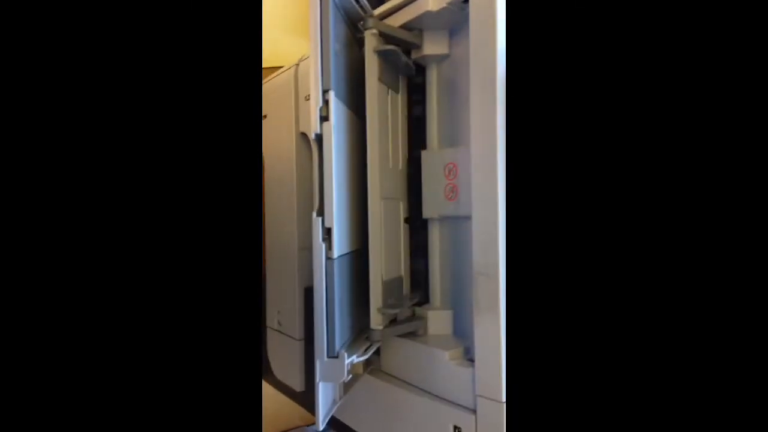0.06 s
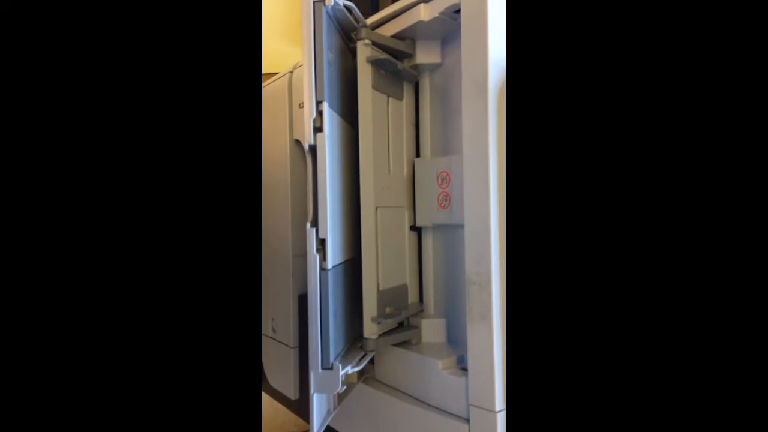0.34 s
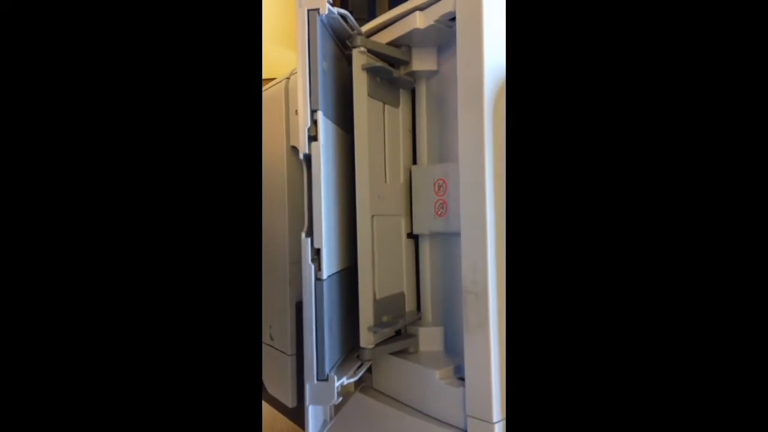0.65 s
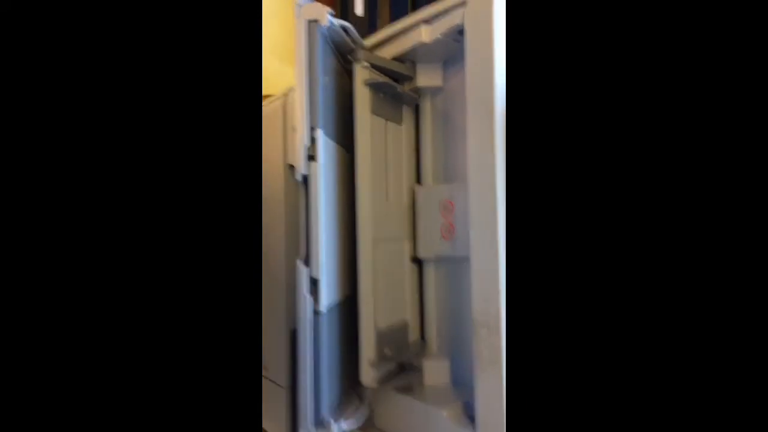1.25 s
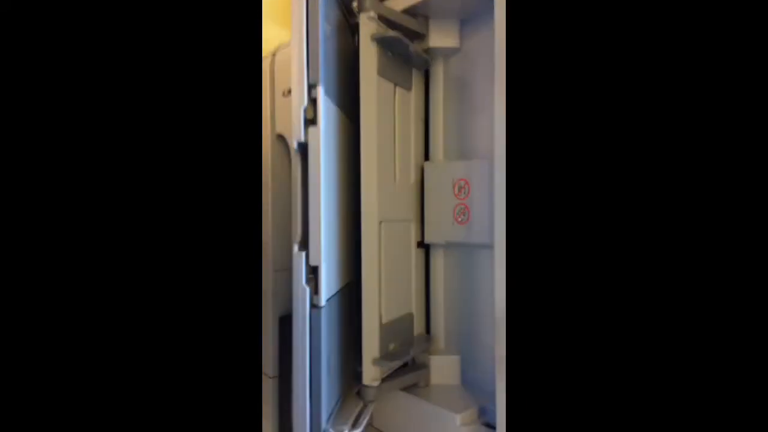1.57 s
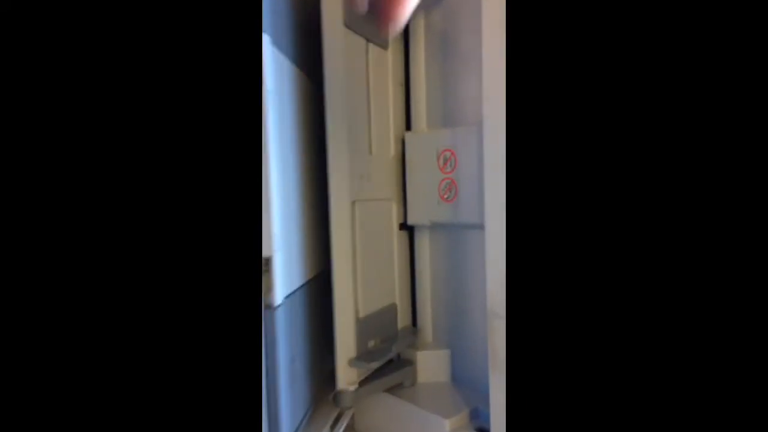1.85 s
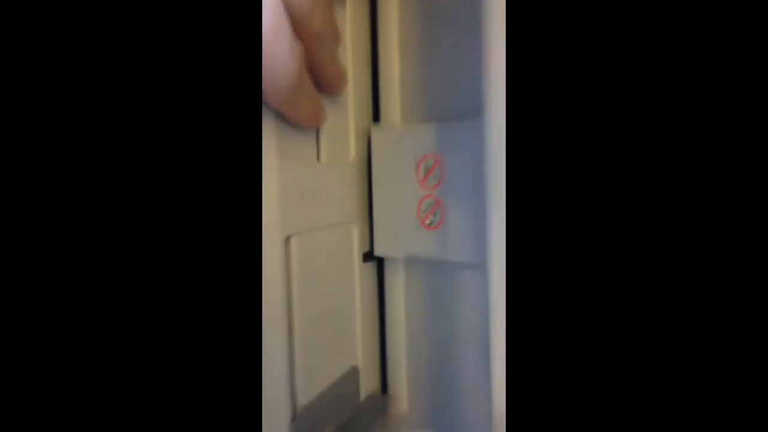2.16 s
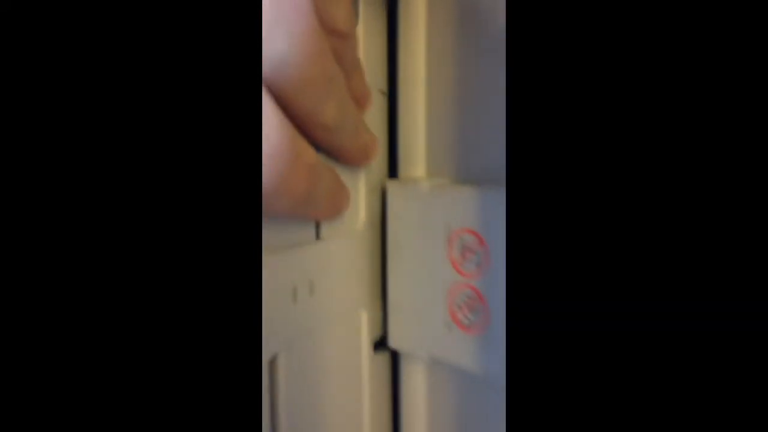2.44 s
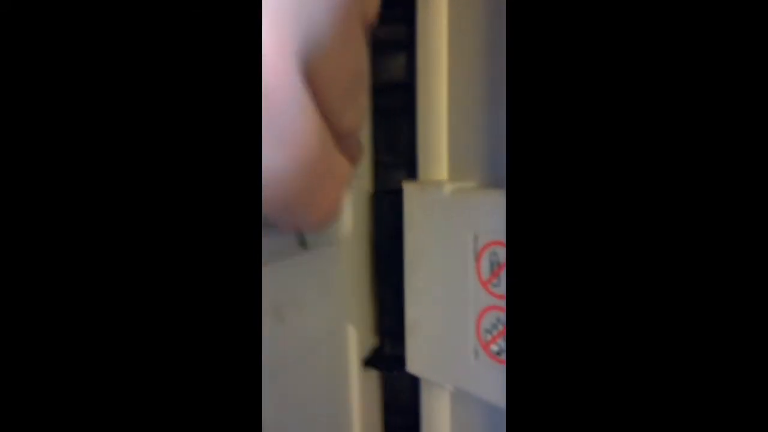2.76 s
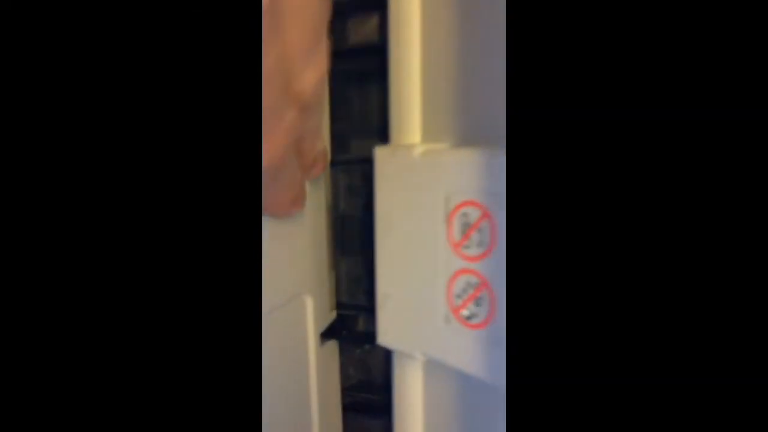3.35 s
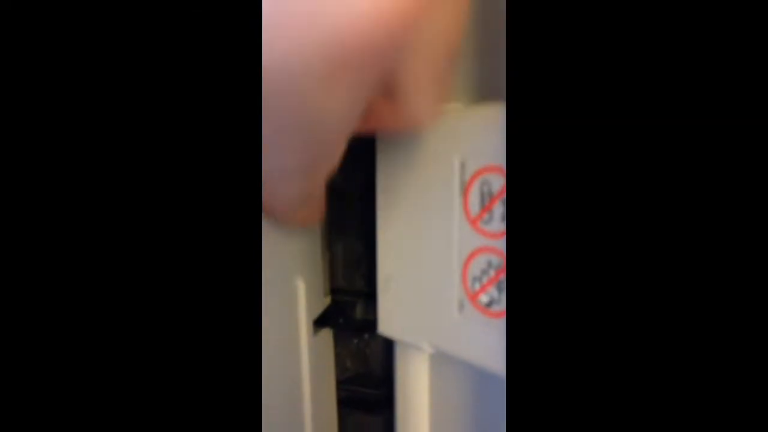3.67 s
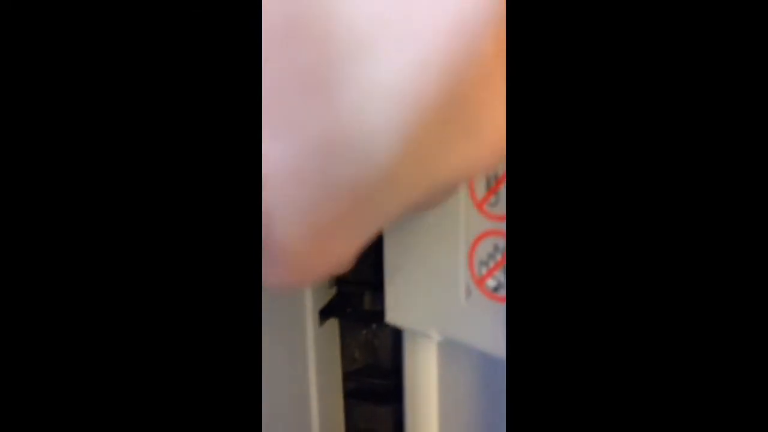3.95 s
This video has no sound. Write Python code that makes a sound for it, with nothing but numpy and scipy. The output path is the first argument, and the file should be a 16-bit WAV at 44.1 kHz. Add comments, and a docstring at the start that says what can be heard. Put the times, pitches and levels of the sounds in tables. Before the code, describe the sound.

Plastic printer tray flaps twice over a whirring motor, followed by handling knocks and clicks.

```python
"""A small room, close to a printer with its side door open. The motor twice drops the plastic paper tray
with a clack and lifts it with a clatter, and the panels ring. A rubber roller squeaks once; the motor
stops and its gears coast. Over the idling fan a hand takes hold of the tray, presses it down, and knocks
and rubs on the plastic. Knocks make the tray ring and the door thump; a spring rings as the tray unlatches."""
import sys
import numpy as np
from scipy import signal
from scipy.fft import rfft, irfft
from scipy.io import wavfile
from scipy.ndimage import uniform_filter1d

SR = 44100
rng = np.random.default_rng(int(sys.argv[2]) if len(sys.argv) > 2 else 0)


def pcm_store(signal):
    """Save signal as 16-bit PCM."""
    levels = np.round(np.clip(np.atleast_2d(signal), -1, 1) * 32767)
    wavfile.write(sys.argv[1], SR, levels.astype(np.int16).T)


N = 176400
T = np.arange(N) / SR
HIT_T = T[:16384]  # time in seconds within one hit

# How long the room echoes. Each row: pitch in Hz, fade time (t60, the time to drop 60 dB) in seconds.
ROOM_T60 = [(120, 0.517), (500, 0.31), (2000, 0.3), (6000, 0.31), (14000, .2)]
# The echo's colour, meaning how strong its lows and highs are. Each row: pitch in Hz, level in dB.
ROOM_COLOUR = [(100, -6), (500, 14), (2000, -0.5), (6000, -0.5), (14000, -5.5)]
# The fan's rush of air. Each row: pitch in Hz, level in dB.
FAN_COLOUR = [(20, -31.5), (55, -6), (90, -22.5), (135, -4), (230, -14), (320, -10.5), (420, -16),
              (660, -14), (1100, -18.5), (2000, -22), (3300, -27.5), (6700, -31), (10000, -32),
              (14700, -32.5), (16000, -48)]
# The fan's hum. Each row: pitch in Hz, level in dB.
FAN_TONES = [(177.6, -63.5), (665, -72.5), (1065, -76.5)]
# The motor's hum. Each row: pitch in Hz, level in dB, fade time after the stop in seconds.
MOTOR_TONES = [(84, -50.5, 0.4), (128.6, -45.5, 0.44), (170, -34.5, 0.078), (246, -57, .2),
               (342.5, -46, 0.12), (426, -54, .2), (510, -56, 0.43)]
# The hum swells with the motor's load. Each row: time in seconds, change of level in dB.
MOTOR_LOAD = [(0, -3.5), (.21, -2.5), (.33, 0.5), (.44, -2), (.54, -2), (.63, 0.5), (.77, -2)]
# The whirr of the gears. Each row: pitch in Hz, level in dB.
GEAR_COLOUR = [(24, -37), (40, -12), (118, -6.5), (180, -13.5), (226, -15), (283, -10.5), (600, -19.5),
               (1210, -13.5), (1340, -12.5), (2000, -8), (2320, -18), (5050, -27.5), (7540, -39.5),
               (14100, -47.5), (16000, -73.5)]
# The frame's modes (its own notes). Each row: pitch in Hz, level in dB, fade time in seconds.
FRAME_MODES = [(994, -52, 1.1), (1714, -62.5, 3.6), (1850, -63.5, 0.9), (2210, -58.5, 1.5)]
# The tones in the squeak. Each row: multiple of the lowest pitch, level in dB.
SQUEAK_TONES = [(1, -23.5), (2, -37), (3, -28), (5, -50)]
# Finger strokes. Each row: start in seconds, length in seconds, level in dB,
# tilt in dB per octave (higher is brighter), level of the plastic's singing in dB.
RUBS = [(2.05, 0.24, -65, 2, -10), (2.243, 0.38, -61, 2, -9), (2.525, 0.11, -58.5, 3.5, -7),
        (2.644, 0.11, -50.5, 2, -1), (2.751, 0.18, -51.5, 2, -5), (2.88, 0.18, -56, -0.5, -8),
        (3.024, 0.066, -53, 2.1, -4), (3.074, 0.18, -57.5, 2.5, -10), (3.234, 0.077, -56, 1.5, -7),
        (3.29, 0.36, -57.5, 0.5, -20), (3.527, 0.17, -53, 2, -13), (3.656, 0.28, -55, 1.5, -5),
        (3.866, 0.48, -49.5, 1.5, -3)]
# The hiss of skin on plastic. Each row: pitch in Hz, level in dB.
RUB_COLOUR = [(24, -34), (40, 4), (220, -2), (663, 0), (942, -6), (1440, -6.5), (1760, -10), (2320, -11.5),
              (6330, -23.5), (14500, -31.5), (16000, -27)]
# Where rubbed plastic sings. Each row: pitch in Hz, width in Hz, level in dB.
RUB_RESONANCES = [(5500, 310, 4), (6300, 400, 2), (8600, 350, -1), (9450, 300, -2), (10700, 400, -8)]
# The spring of the catch. Each row: start in seconds, pitch in Hz, level in dB, fade time in seconds.
CATCH = [(2.827, 5470, -44, .32)]
# Small parts ticking. Each row: start in seconds, pitch in Hz, level in dB, fade time in seconds.
PINGS = [(2.675, 2290, -33, 0.068), (3.557, 1540, -37, 0.061), (3.725, 3210, -41, 0.035),
         (3.867, 3190, -43, 0.067), (3.985, 3190, -48, 0.14)]
# The side door's low notes. Each row: pitch in Hz, level in dB, fade time in seconds.
DOOR_MODES = [(73.4, -7, 0.2), (119.2, -5.5, 0.18), (176, -3.5, 0.072), (226, -5.5, 0.076),
              (307.5, 1.5, 0.064), (405, -14, 0.044), (472, -11.5, 0.11), (534, -7.5, 0.053),
              (727, -11, 0.063)]
# The hand's knocks. Each row: start in seconds, level in dB, fade time in seconds, tilt in dB per
# octave, treble limit in Hz, tray ring in dB, door thump in dB, centre of the thump in Hz.
KNOCKS = [(1.2124, -53, 0.044, 1.5, 8000, -17, -58, 150), (2.34, -43, 0.065, 1.5, 4200, -8, -70, 400),
          (2.5385, -32.5, 0.045, -5, 5170, -27.5, -46, 500), (2.553, -36, 0.05, -11, 2950, -15, -48, 350),
          (2.6755, -29, 0.056, -1, 4000, -6.5, -51, 750), (2.813, -40.5, 0.082, 4.5, 6000, -14, -65, 200),
          (2.827, -24, 0.097, 1.5, 9700, -4.5, -32, 302), (2.8462, -24, 0.041, 4, 15000, -23, -35.5, 120),
          (2.857, -33, 0.054, 2, 15000, -14, -61, 300), (2.867, -34, 0.024, 4, 12000, -18, -63, 300),
          (3.073, -36.5, 0.091, -2, 4970, -6.5, -47, 395), (3.168, -62, .05, 7, 9000, -16, -52, 75),
          (3.476, -49.5, 0.11, -0.5, 2980, -16, -57, 400), (3.557, -42, 0.074, 1.5, 3970, -16, -45, 250),
          (3.583, -57, .05, -20, 4000, -12, -48, 80), (3.722, -49, 0.066, 2.5, 10000, -15, -59, 300),
          (3.865, -48.5, 0.09, 5.5, 11100, -21, -41, 178), (3.884, -50, 0.046, 8, 9000, -14, -46, 200)]
# The noise of a knock. Each row: pitch in Hz, level in dB.
KNOCK_COLOUR = [(88, -32.5), (150, -29), (348, -5), (1790, -7), (2360, -1.5), (2700, -11.5), (3290, -13),
                (4950, -13), (5460, -12.5), (7620, -21), (10800, -25.5), (14800, -28), (16000, -64)]
# The notes of the printer's panels. Each row: pitch in Hz, level in dB, fade time in seconds.
HOUSING_MODES = [(872, -1.5, .17), (957, -4, 0.067), (1180, -11.5, .18), (1287, 0, .18), (1564, -10.5, .12),
                 (1960, -4, 0.059), (2060, -3.5, .13), (2680, -9, .16), (3108, 2.5, .15), (3385, -6, .13),
                 (4050, -8.5, .06), (5550, -2.5, .06)]
# The notes of the tray. Each row: pitch in Hz, level in dB, fade time in seconds.
TRAY_MODES = [(1170, -33, .03), (1537, -24.5, 0.01), (1987, -1, 0.026), (2352, -8.5, 0.025),
              (2650, -4, 0.026), (3104, -3, .035), (3380, -0.5, 0.0294), (5170, -4, 0.034)]
# The tray slaps its stop. Each row: start in seconds, level in dB.
SLAPS = [(0.0549, -10.5), (0.5124, -8)]
# The noise of a slap. Each row: pitch in Hz, level in dB.
SLAP_COLOUR = [(120, -47.5), (200, -22.5), (1320, -7.5), (1840, 2.5), (2650, 0), (3830, -18), (5230, -8),
               (6050, -15), (8900, -28.5), (14100, -26), (16000, -35)]
# Loose parts rattle as the tray bounces and lifts, and the tray slides briefly before each slap. Each row:
# start in seconds, level in dB, # rise time in seconds, fade time in seconds, tilt in dB per octave.
RATTLES = [(.044, -30, 0.0085, .04, -3), (0.0643, -19, 0.003, 0.052, 0.5),
           (0.1846, -30, 0.00078, 0.041, -2), (0.2002, -31, 0.0012, 0.051, -1),
           (0.2161, -23, 0.00072, 0.067, 4), (0.223, -21, 0.0073, 0.066, 2),
           (0.233, -24, 0.0011, 0.06, 2.5), (0.247, -30, 0.0045, 0.13, 0),
           (.262, -27.5, 0.0045, 0.092, 0.3), (0.2732, -27.5, .0005, 0.035, 0),
           (.283, -32.5, 0.02, 0.12, 0.5), (0.3457, -32, .002, 0.042, -6),
           (0.39, -27.5, 0.00063, .04, -4.5), (.4228, -26.5, 0.00063, 0.046, -1),
           (.427, -28.5, 0.0017, 0.031, -2), (.5, -30, 0.012, 0.044, -1), (0.5223, -17, .001, 0.042, 1.5),
           (0.672, -29.5, 0.0008, 0.097, -4.5), (0.6867, -24.5, 0.00099, 0.067, 3),
           (.692, -21.5, .003, 0.079, 3), (0.703, -21.5, 0.00059, 0.067, -1),
           (.716, -31.5, 0.0021, 0.12, 2.5), (.737, -29.5, 0.005, 0.097, 1),
           (0.759, -39, 0.0009, 0.089, 10)]
# The noise of a rattle. Each row: pitch in Hz, level in dB.
RATTLE_COLOUR = [(120, -29.5), (200, -10.5), (236, -9.5), (473, -8.5), (791, -10), (933, -8.5),
                 (1870, -4.5), (2380, -4.5), (2650, -16), (3190, -10), (8740, -17), (14300, -30.5),
                 (16000, -48)]


def amp(db):
    """Turns decibels into a number to multiply by."""
    return 10 ** (np.asarray(db) / 20)


def unit(x):
    """Scales a signal to an average (rms) size of 1."""
    return x / np.sqrt(np.mean(x ** 2) + 1e-20)


def read(points, hz):
    """Looks up a pitch in a table, blending between rows."""
    pitches, values = np.transpose(points)
    return np.interp(np.log(hz + 1), np.log(pitches + 1), values)


def add(mix, start, sound):
    """Mixes a sound in at a start time in seconds."""
    part = mix[max(round(start * SR), 0):][:len(sound)]
    part += sound[:len(part)]


def fade(t, t60):
    """Stays at 1 until t = 0, then drops 60 dB every t60 seconds."""
    return np.exp(-np.log(1000) * np.maximum(t, 0) / np.maximum(t60, 1e-4))


def colour(x, points, tilt_db=0):
    """Shapes the lows and highs of noise by a table and a tilt, keeping its power."""
    hz = abs(np.fft.fftfreq(4096, 1 / SR))
    log_gain = np.log(amp(read(points, hz) + tilt_db * np.log2(np.clip(hz, 300, 12000))))
    taps = np.fft.ifft(np.exp(np.conj(signal.hilbert(log_gain)))).real  # keeps the start of a hit sharp
    return signal.fftconvolve(x, taps / np.linalg.norm(taps))[:len(x)]


def resonate(x, hz, width_hz):
    """Lets through a narrow band around one pitch, so it rings."""
    return signal.lfilter(*signal.iirpeak(hz, hz / width_hz, fs=SR), x)


def wander(rate_hz):
    """A smooth random wobble; a higher rate makes it quicker."""
    hz = np.fft.rfftfreq(N, 1 / SR)
    return unit(irfft(rfft(rng.standard_normal(N)) * np.exp(-(hz / rate_hz) ** 2), N))


def burst(rise, t60, grain_db=0):
    """A swarm of tiny contacts swells and dies away; grain_db makes them uneven."""
    sign = rng.choice([-1., 1.], len(HIT_T))
    size = rng.standard_normal(len(HIT_T))
    clumps = unit(uniform_filter1d(size, size=12)) + unit(uniform_filter1d(size[::-1], size=50))
    contacts = unit(sign * amp(grain_db * np.clip(clumps, -3, 2.5)))
    return contacts * np.minimum(HIT_T / rise, 1) * fade(HIT_T - rise, t60)


def hum(tones, drift, waver_db, rate_hz):
    """Tones that share one drifting speed, each wavering in level."""
    clock = np.cumsum(1 + drift * wander(rate_hz)) / SR
    return sum(amp(db + waver_db * wander(rate_hz)) * np.sqrt(2)
               * np.sin(2 * np.pi * (hz * clock + rng.random())) for hz, db in tones)


def note(hz, db, t60):
    """One pure tone, struck and left to fade."""
    return amp(db) * fade(HIT_T, t60) * np.sin(2 * np.pi * hz * HIT_T)


def room(x):
    """The walls send back a blur of echoes, the treble dying first."""
    hz, t, bands = signal.stft(rng.standard_normal(SR), SR, nperseg=256)
    bands = bands * fade(t, read(ROOM_T60, hz)[:, None]) * amp(read(ROOM_COLOUR, hz))[:, None]
    tail = signal.istft(bands, SR, nperseg=256)[1][:SR] * np.minimum(T[:SR] / 0.018, 1)
    return signal.fftconvolve(x, tail / np.linalg.norm(tail))[:N] * amp(-6)


def fan():
    """The idling fan moves air with a soft rush and a faint hum."""
    air = amp(-60) * colour(rng.standard_normal(N), FAN_COLOUR)
    return air + hum(FAN_TONES, drift=.003, waver_db=1.2, rate_hz=3.06)


def drive():
    """The motor hums and the gears whirr; after the stop the gears coast and the frame rings out."""
    since_stop = T - 0.78
    teeth = 1 + 0.12 * np.sin(2 * np.pi * MOTOR_TONES[2][0] * T)  # pulses with the strongest tone
    whirr = colour(rng.standard_normal(N) * teeth * amp(4.2 * wander(60)), GEAR_COLOUR)
    gears = amp(-45) * fade(since_stop, t60=0.17) * whirr
    lowest, *upper = [hum([(hz, db)], drift=.005, waver_db=2.65, rate_hz=11.3) * fade(since_stop, t60)
                      for hz, db, t60 in MOTOR_TONES]
    drone = amp(12 * np.exp(-((T - 0.454) / 0.03) ** 2))  # a swell just before the second drop
    load = amp(np.interp(T, *np.transpose(MOTOR_LOAD)))
    motor = lowest * drone + sum(upper) * load
    frame = sum(amp(db) * fade(since_stop, t60) * np.sin(2 * np.pi * hz * T)
                for hz, db, t60 in FRAME_MODES)
    coast = amp(-47) * fade(since_stop, t60=1.04) * colour(rng.standard_normal(N), GEAR_COLOUR, tilt_db=2)
    return motor + frame + coast + gears


def tick():
    """One very short, high tick."""
    out = np.zeros(N)
    rise, hz = .0002, 9620
    shape = np.minimum(HIT_T / rise, 1) * fade(HIT_T - rise, t60=0.00098)
    add(out, start=1.6248, sound=amp(-28.5) * shape * np.sin(2 * np.pi * hz * HIT_T))
    return out


def squeak():
    """A rubber roller sticks and slips unevenly for a moment."""
    pitch_hz, jitter, rough_db = 722, .01, 1.9
    cycles = np.cumsum(pitch_hz * (1 + jitter * wander(250))) / SR
    swell = np.interp(T, [0.282, 0.314, .328], [0, 1, 0]) * amp(rough_db * wander(210))
    return swell * np.sqrt(2) * sum(amp(db) * np.sin(2 * np.pi * k * cycles) for k, db in SQUEAK_TONES)


def fingers():
    """Skin slides on the plastic with an uneven grip and makes it sing faintly."""
    out = np.zeros(N)
    grip = amp(1.5 * wander(70))
    for start, length, db, tilt_db, sing_db in RUBS:
        stroke = np.sqrt(abs(np.sin(np.pi * np.clip((T - start) / length, 0, 1))))
        hiss = colour(rng.standard_normal(N) * grip, RUB_COLOUR, tilt_db)
        sing = sum(amp(peak_db) * resonate(hiss, hz, width) for hz, width, peak_db in RUB_RESONANCES)
        out += amp(db) * stroke * (hiss + amp(sing_db) * sing)
    return out


def catch():
    """A small spring rings thinly as the tray unlatches."""
    out = np.zeros(N)
    for start, hz, db, t60 in CATCH:
        add(out, start, note(hz, db, t60))
    return out


def pings():
    """Small parts ring briefly, each with a dull, pitched tick."""
    out = np.zeros(N)
    for start, hz, db, t60 in PINGS:
        ring = unit(resonate(rng.standard_normal(len(HIT_T)), hz, width_hz=53))
        add(out, start, amp(db - 1) * fade(HIT_T, t60) * ring)
    return out


def door_thump(centre_hz):
    """A push stirs the door's low notes, most of all those near centre_hz."""
    rise, drop_db_per_octave = 0.0049, 5.5
    ring = sum((-1) ** k * note(hz, db - drop_db_per_octave * abs(np.log2(hz / centre_hz)), t60)
               for k, (hz, db, t60) in enumerate(DOOR_MODES))
    return amp(5.5) * np.minimum(HIT_T / rise, 1) * ring


def tray_ring(tilt_db=0):
    """One blow sets all the tray's notes ringing."""
    return sum((-1) ** k * note(hz, db + tilt_db * np.log2(hz / 2000), t60)
               for k, (hz, db, t60) in enumerate(TRAY_MODES))


def knocks():
    """The hand knocks the tray and the door thumps; a softer touch has less treble."""
    out = np.zeros(N)
    for start, db, t60, tilt_db, limit_hz, ring_db, thump_db, thump_hz in KNOCKS:
        contact = colour(burst(0.00023, t60, grain_db=0.34), KNOCK_COLOUR, tilt_db)
        knock = contact + amp(ring_db) * tray_ring(tilt_db)
        soften = signal.butter(3, limit_hz, fs=SR, output="sos")
        add(out, start, amp(db) * signal.sosfilt(soften, knock))
        add(out, start, amp(thump_db) * door_thump(thump_hz))
    return out


def housing(clacks):
    """The panels ring on after each clack."""
    return amp(2.5) * sum(amp(db) * resonate(clacks, hz, width_hz=np.log(1000) / np.pi / t60)
                          for hz, db, t60 in HOUSING_MODES)


def tray():
    """The tray slides, slaps hard on its stop, and loose plastic parts rattle."""
    out = np.zeros(N)
    for start, db in SLAPS:
        contact = colour(burst(rise=.0004, t60=0.032), SLAP_COLOUR)
        add(out, start, amp(db) * (amp(-2) * contact + amp(-11.5) * tray_ring()))
    for start, db, rise, t60, tilt_db in RATTLES:
        add(out, start, amp(db) * colour(burst(rise, t60, grain_db=2), RATTLE_COLOUR, tilt_db))
    return out


def scene():
    """Mixes printer, hand and fan; the clacks, the squeak and the hand echo in the room."""
    clacks, roller = tray(), squeak()
    clacks = clacks + housing(clacks)
    hand = knocks() + pings() + catch() + fingers()
    background = fan()
    echo = room(amp(-8) * clacks + amp(-14) * roller + amp(-15) * hand)
    return (clacks + roller + hand + tick() + drive() + background + echo)[None]


def record(dry):
    """Cuts the very highest treble, above 15500 Hz."""
    taps = signal.firwin(255, 15500, window=("kaiser", 8), fs=SR)
    return signal.oaconvolve(dry, taps[None], "same")


dry = scene()
out = record(dry)
pcm_store(out)
```